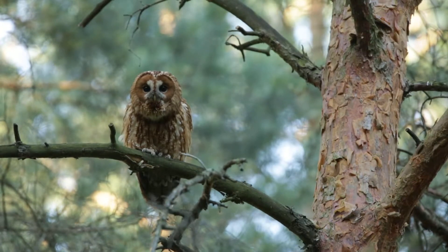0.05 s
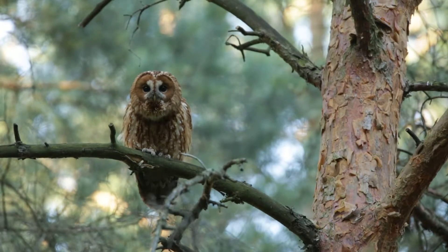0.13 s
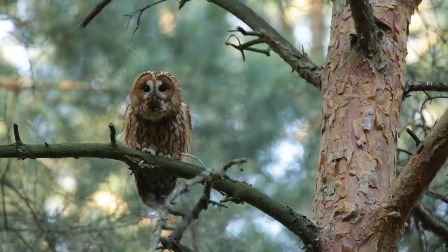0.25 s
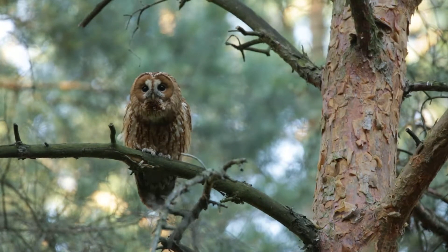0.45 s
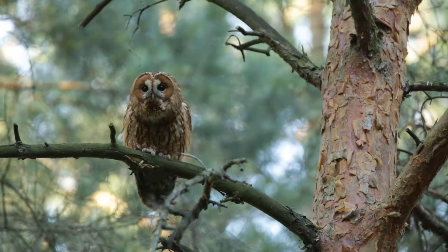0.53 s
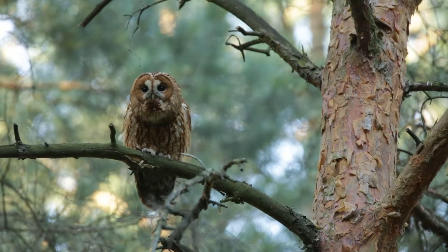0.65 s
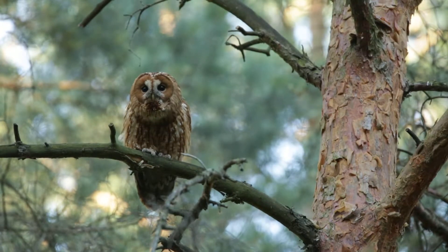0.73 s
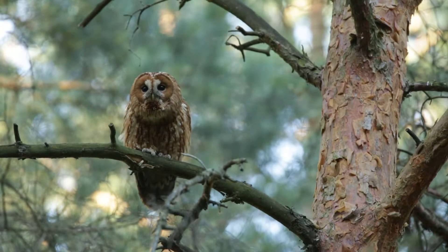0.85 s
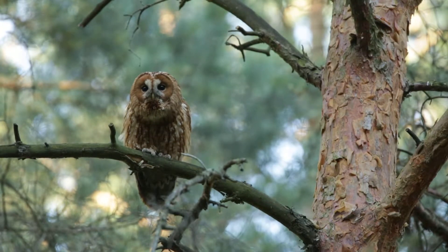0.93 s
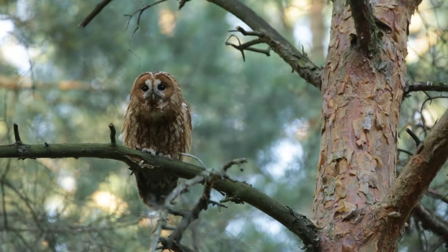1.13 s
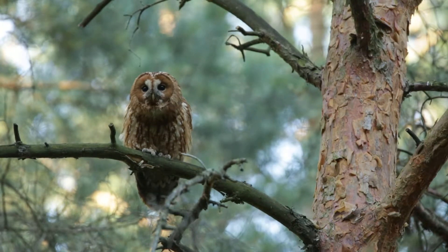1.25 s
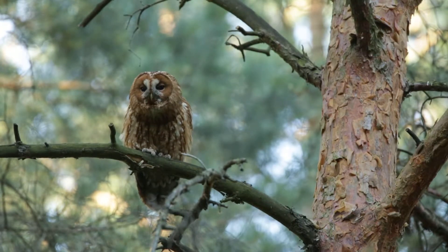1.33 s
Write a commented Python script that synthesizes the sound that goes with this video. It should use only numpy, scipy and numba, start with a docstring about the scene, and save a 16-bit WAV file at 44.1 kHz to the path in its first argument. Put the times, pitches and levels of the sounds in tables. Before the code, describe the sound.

One owl call turns from a rasp into a falling hoot in a quiet forest.

```python
"""An owl on a pine branch gives one long call. It starts hoarse, as rattling voice membranes excite the
resonances of the throat, then snaps into a clean periodic tone that slides down and fades.
The trunks reflect it as a few distinct echoes and scatter it into diffuse reverberation.
A small songbird twitters far off, over soft hiss and a low distant rush."""
import sys
import numpy as np
from scipy import signal
from scipy.fft import rfft, irfft
from scipy.io import wavfile
from scipy.ndimage import uniform_filter1d, map_coordinates
from numba import njit

SR = 44100
rng = np.random.default_rng(int(sys.argv[2]) if len(sys.argv) > 2 else 0)


def wrap_up_sound(samples):
    """Save the sound to the file named by the first command line argument, as 16-bit audio."""
    columns = np.atleast_2d(samples).T
    # keep every value between -1 and 1, then stretch to whole-number steps
    tamed = np.clip(columns, -1, 1)
    steps = np.round(tamed * 32767).astype(np.int16)
    wavfile.write(sys.argv[1], SR, steps)


N = 61739
FLUTTER_PER_S = 310  # rate of the random fluctuations in the owl's voice


def owl_tone():
    """Self-sustained oscillation: randomly modulated while hoarse, then clean with mostly odd harmonics."""
    # The fundamental. Each row: time in seconds, pitch in Hz, level in dB.
    voice = [(.2, 750, -68), (.21, 760, -49), (.222, 795, -38.5), (.236, 970, -39.5), (.28, 1020, -46),
             (.33, 1000, -43.5), (.42, 987.2, -42.5), (.605, 999, -45.5), (.64, 1001, -39.5),
             (.702, 997.6, -36.5), (.712, 884.4, -32), (.75, 866.7, -30.5), (.81, 867.5, -32),
             (.855, 835.3, -41), (.875, 821, -33.5), (.935, 783, -35), (.955, 772, -44.5),
             (1.04, 726, -46.5), (1.13, 685, -50.5), (1.17, 640, -53.5)]
    # Harmonics of the clean tone before dulling. Each row: harmonic number, dB relative to the fundamental.
    harmonics = [(2, -39.5), (3, -19.5), (4, -38), (5, -32.5), (7, -53)]
    rough_from_s, clean_from_s, snap_s = .226, .706, .02
    rough_jitter_hz, base_jitter_hz = 26.1, 2.9
    burr_hz, burr_wander_hz = 176.6, 15.7  # a faint fast throb on the clean tone
    dull_below_hz, dulling_db_per_hz = 875, .12  # the harmonics fade as the pitch sinks
    t = np.arange(N) / SR
    hz, db = curves(voice)
    clean = np.clip((t - clean_from_s) / snap_s + .5, 0, 1)
    rough = np.clip((t - rough_from_s) / snap_s + .5, 0, 1) * (1 - clean)
    phase = phase_of(hz + (rough_jitter_hz * rough + base_jitter_hz) * wander(FLUTTER_PER_S))
    burr = .07 * clean * np.sin(phase_of(burr_hz + burr_wander_hz * wander(FLUTTER_PER_S)))
    sidebands = wander(FLUTTER_PER_S) * np.sin(phase) + wander(FLUTTER_PER_S) * np.cos(phase)
    flutter = .65 * rough * sidebands / np.sqrt(2)
    dulling = undb(dulling_db_per_hz * np.minimum(hz - dull_below_hz, 0))
    brightness = clean * dulling * (1 + .19 * wander(FLUTTER_PER_S))
    overtones = sum(undb(gain_db) * np.sin(number * phase) for number, gain_db in harmonics)
    envelope = np.sqrt(2) * gate(voice) * undb(db) * (1 + burr)
    return envelope * (np.sin(phase) + flutter + brightness * overtones)


def owl_rattle():
    """Source and filter: uneven membrane pulses and rushing air excite the resonances of the throat."""
    # The hoarse part. Each row: time in seconds, level in dB, throat tuning ratio, tilt in dB per octave.
    hoarseness = [(.2, -71, 0.98, -5), (.228, -47, 0.98, -3), (.26, -44.5, 0.99, -1),
                  (.35, -44.5, 1.003, -1), (.47, -48, 1.004, 0.5), (.58, -44.5, 1.005, 0.2),
                  (.64, -46, .982, -0.1), (.695, -45.5, .968, -2), (.728, -77, 0.89, 0)]
    # Throat resonances. Each row: centre in Hz, bandwidth of one filter stage in Hz, relative level in dB.
    formants = [(834, 203, -5), (1040, 304, -3.5), (1295, 200, -4), (2040, 400, -17), (2385, 213, -3),
                (2702, 154, -2), (3256, 410, -11), (3779, 240, -7.5), (4490, 530, -5), (4714, 220, -1.8),
                (5550, 990, -17.5), (6240, 530, -12), (12400, 4400, -19.5)]
    pulses_per_s, rate_scatter, air_gain = 950, .35, .76
    db, tuning, tilt_db = curves(hoarseness)
    cycles = phase_of(pulses_per_s * np.exp(rate_scatter * wander(pulses_per_s))) / (2 * np.pi)
    pulses = np.diff(np.floor(cycles), prepend=0) * rng.rayleigh(size=N)
    drive = unit_rms(pulses - pulses.mean()) + air_gain * rng.standard_normal(N)
    throat = 0
    for hz, width_hz, gain_db in formants:
        ring = drive
        for _ in range(3):  # stages in cascade sharpen the resonance
            ring = resonate(ring, hz * tuning, float(width_hz))
        throat = throat + undb(gain_db + tilt_db * np.log2(hz / pulses_per_s)) * unit_rms(ring)
    untilted_rms = np.sqrt(sum(undb(gain_db) ** 2 for _, _, gain_db in formants))
    return gate(hoarseness) * undb(db) * throat / untilted_rms


def owl_whistle():
    """Biphonation: a second, unsteady oscillation sounds high above the hoarse voice."""
    # The thin second tone. Each row: time in seconds, pitch in Hz, level in dB.
    whistle = [(.28, 2423, -68), (.36, 2442, -49.5), (.46, 2438, -46), (.535, 2442, -49.5),
               (.56, 2380, -48.5), (.65, 2370, -53.5), (.71, 2360, -67)]
    jitter_hz = 13.4
    hz, db = curves(whistle)
    phase = phase_of(hz + jitter_hz * wander(FLUTTER_PER_S))
    return np.sqrt(2) * gate(whistle) * undb(db) * np.sin(phase)


def trunk_echoes(x):
    """Reflection: groups of trunks return dull, delayed copies that beat against the falling tone."""
    # Distinct reflections. Each row: delay in seconds, gain in dB.
    echoes = [(.045, -14), (.186, -17.5), (.295, -19.5), (.395, -20), (.58, -24)]
    cutoff_hz = 1250
    t = np.arange(N) / SR
    dull = signal.sosfilt(signal.butter(4, cutoff_hz, fs=SR, output="sos"), x)
    return sum(undb(db) * np.interp(t - delay, t, dull, left=0) for delay, db in echoes)


def forest_reverb(x):
    """Multiple scattering: echoes from many trunks build up, then decay exponentially in two bands."""
    # The treble is the weaker band and lingers slightly longer.
    low_t60_s, low_db, high_t60_s, high_db = .87, -10.5, 1, -13
    delay_s, build_s, split_hz = .022, .04, 1940
    since = np.maximum(np.arange(N) / SR - delay_s, 0)
    response = 0
    for band, t60, db in (("low", low_t60_s, low_db), ("high", high_t60_s, high_db)):
        envelope = (1 - np.exp(-since / build_s)) * np.exp(-np.log(1000) * since / t60)
        tail = unit_rms(envelope * rng.standard_normal(N)) / np.sqrt(N)
        crossover = signal.butter(2, split_hz, band, fs=SR, output="sos")
        response = response + undb(db) * signal.sosfilt(crossover, tail)
    return signal.fftconvolve(x, response)[:N]


def songbird():
    """Frequency modulation: each short whistled note wavers along a parabola through three pitches."""
    # The notes. Each row: start and length in seconds, first, middle and last pitch in Hz, peak in dB.
    notes = [(0.087, 0.059, 3200, 3240, 3350, -62.5), (.15, 0.034, 3120, 3300, 3550, -60),
             (0.188, .045, 3430, 3180, 3050, -67), (0.547, .06, 3160, 3105, 3500, -57),
             (0.785, 0.044, 3356, 3270, 3660, -52), (0.983, .06, 3195, 3110, 3734, -54),
             (1.082, 0.051, 3700, 3092, 2870, -61), (1.189, .045, 2680, 3130, 3913, -59),
             (1.226, 0.036, 3400, 3200, 2930, -61), (1.278, 0.04, 3350, 3327, 3700, -58),
             (1.335, 0.047, 3600, 3450, 3240, -56.5)]
    t, song = np.arange(N) / SR, 0
    for start, length, first, middle, last, db in notes:
        progress = np.clip((t - start) / length, 0, 1)
        glide_hz = np.polyval(np.polyfit([0, .5, 1], [first, middle, last], 2), progress)
        phase = phase_of(glide_hz * (1 + .0141 * wander(300)))
        song = song + undb(db) * np.sin(np.pi * progress) * np.sin(phase)
    return song


def forest_air():
    """Broadband noise: a soft hiss grows slowly while a low distant rush swells and ebbs."""
    # Spectra of the hiss and the rush. Each row: frequency in Hz, relative spectral density in dB.
    hiss_spectrum = [(880, -19), (1500, -9), (2330, -5.5), (3210, -3.5), (3690, -5.5), (3950, -7),
                     (4230, -8), (6310, -10), (8880, -11), (15500, -18)]
    rush_spectrum = [(20, -21), (35, -5.5), (55, -1.5), (110, -4.5), (190, -3), (290, 3.5), (400, 1),
                     (530, -6), (800, -5), (1200, -7), (1800, -18), (4000, -59)]
    # The swell of the rush. Each row: time in seconds, level in dB.
    rush_level = [(0, -58), (.42, -53), (.5, -52.5), (.61, -57), (.8, -56.5), (1.05, -56.5), (1.4, -51.5)]
    hiss_db, rise_db_per_s = -59.5, 1.62
    t = np.arange(N) / SR
    hiss = coloured_noise(hiss_spectrum) * undb(hiss_db + rise_db_per_s * t + .26 * wander(7.3))
    rush = coloured_noise(rush_spectrum) * undb(curves(rush_level)[0] + 1.07 * wander(14.74))
    return hiss + rush


@njit
def resonate(x, hz, width):
    """Second-order resonance: a band-pass with unit gain at its moving centre frequency."""
    y, band_state, low_state = np.empty(len(x)), 0., 0.
    for i in range(len(x)):
        step, damping = np.tan(np.pi * hz[i] / SR), width / hz[i]
        band = (band_state + step * (x[i] - low_state)) / (1 + step * (step + damping))
        band_state = 2 * band - band_state
        low_state += 2 * step * band
        y[i] = damping * band
    return y


def coloured_noise(spectrum):
    """Spectral shaping: white noise is weighted by (Hz, dB) points and scaled to rms 1."""
    hz, db = np.array(spectrum, float).T
    bins_hz = np.maximum(np.fft.rfftfreq(N, 1 / SR), 1)
    gain = undb(np.interp(np.log(bins_hz), np.log(hz), db))
    return unit_rms(irfft(rfft(rng.standard_normal(N)) * gain, N))


def wander(rate):
    """A smooth random signal of rms 1 that changes about rate times a second."""
    return unit_rms(map_coordinates(rng.standard_normal(4096), [np.arange(N) / SR * rate], mode="wrap"))


def curves(table):
    """Linear interpolation of each column of a timed table, one value per sample."""
    times, *columns = np.array(table, float).T
    return [np.interp(np.arange(N) / SR, times, column) for column in columns]


def gate(table):
    """A soft-edged window: 1 between the first and last time of a table, 0 outside."""
    t = np.arange(N) / SR
    return uniform_filter1d(1. * ((t > table[0][0]) & (t < table[-1][0])), size=200)


def phase_of(hz):
    """Phase in radians, the time integral of angular frequency."""
    return 2 * np.pi * np.cumsum(hz) / SR


def undb(db):
    """Decibels to amplitude ratio."""
    return 10 ** (np.asarray(db) / 20)


def unit_rms(x):
    """Normalisation to rms 1."""
    return x / np.sqrt(np.mean(x ** 2))


def scene():
    """Superposition: the near owl, the far songbird, their reflections and the background noise add."""
    owl = owl_tone() + owl_rattle() + owl_whistle()
    bird = songbird()
    reverberation = forest_reverb(owl + undb(5.5) * bird)  # the farther source is more reverberant
    return (owl + trunk_echoes(owl) + bird + reverberation + forest_air())[None]


def record(dry):
    """Band limiting: a steep low-pass filter removes the highest treble."""
    cutoff_hz = 15520
    return signal.sosfilt(signal.ellip(10, .2, 70, cutoff_hz, fs=SR, output="sos"), dry)


dry = scene()
out = record(dry)
wrap_up_sound(out)
```